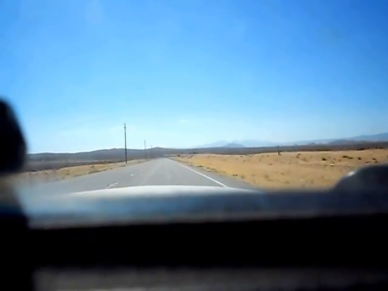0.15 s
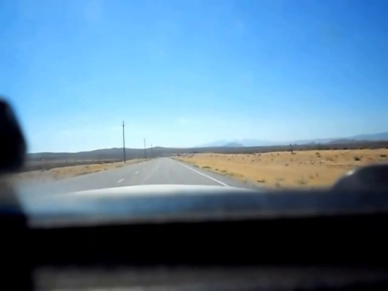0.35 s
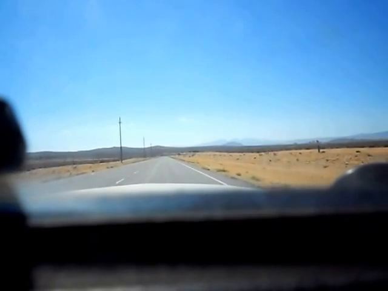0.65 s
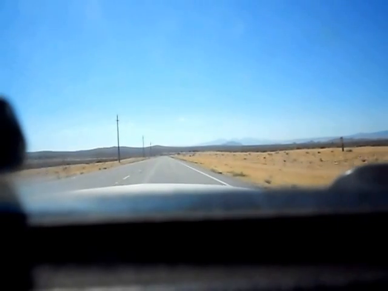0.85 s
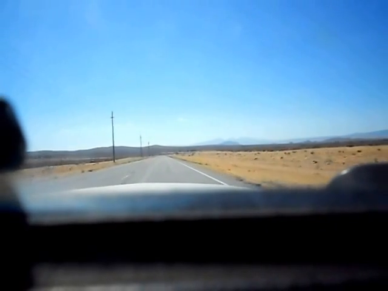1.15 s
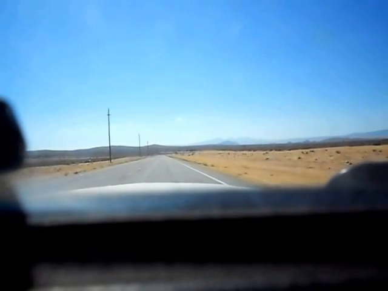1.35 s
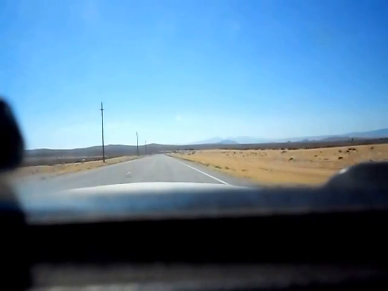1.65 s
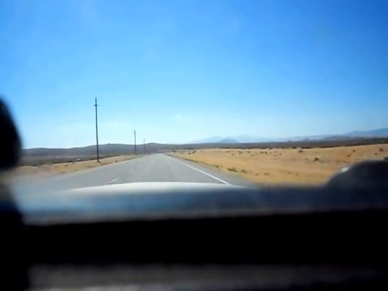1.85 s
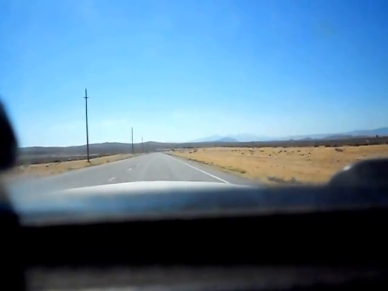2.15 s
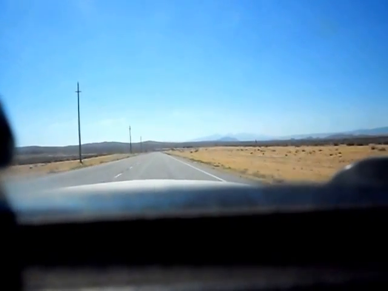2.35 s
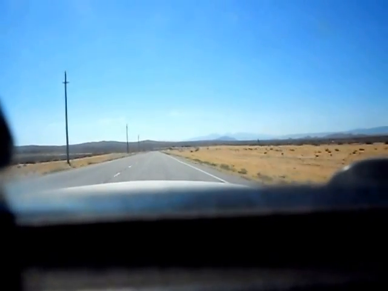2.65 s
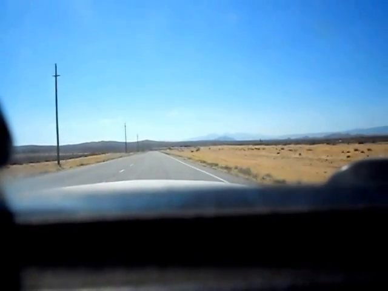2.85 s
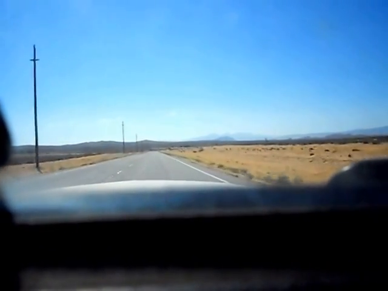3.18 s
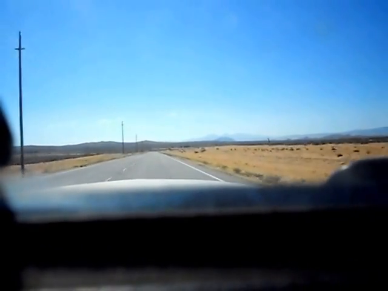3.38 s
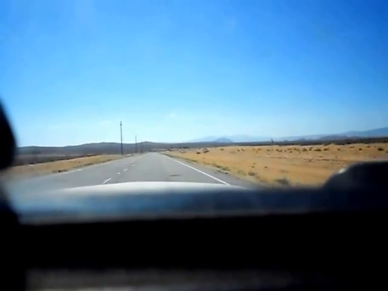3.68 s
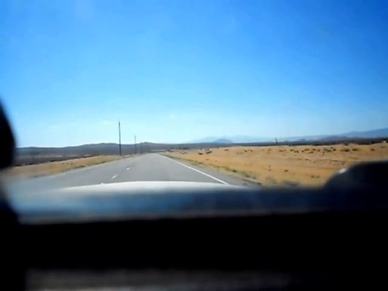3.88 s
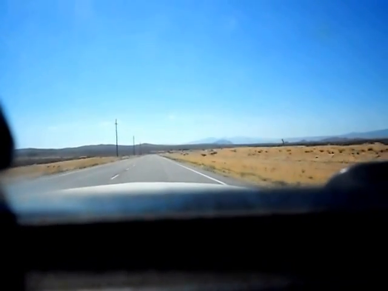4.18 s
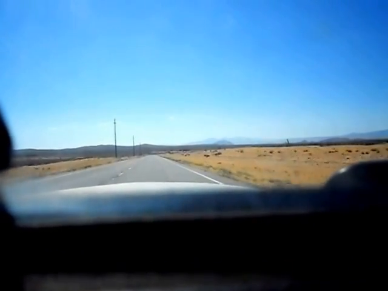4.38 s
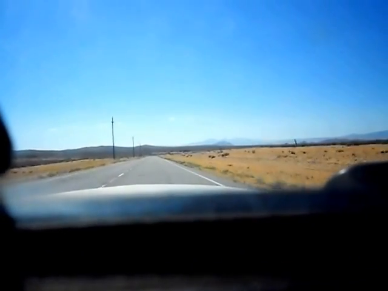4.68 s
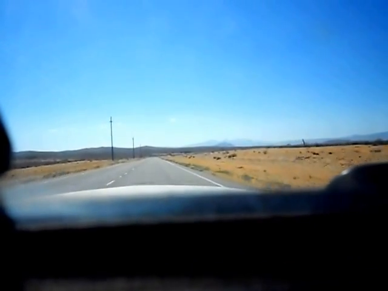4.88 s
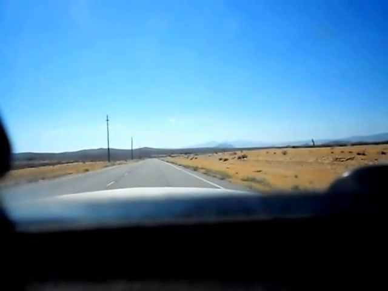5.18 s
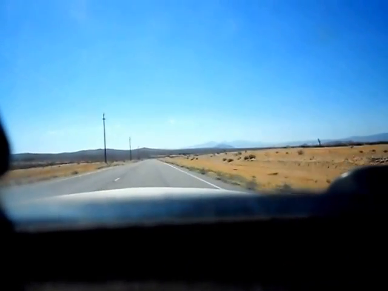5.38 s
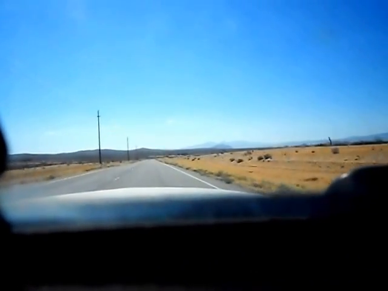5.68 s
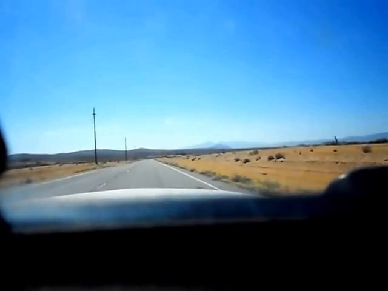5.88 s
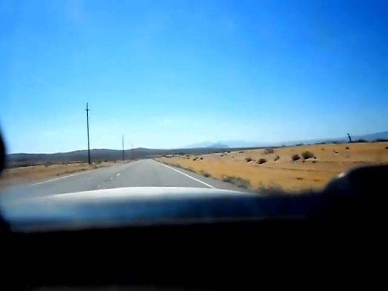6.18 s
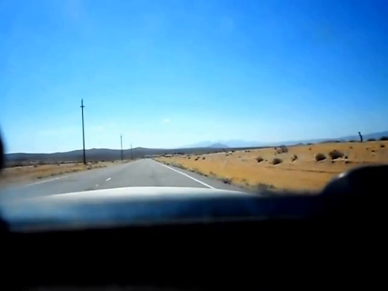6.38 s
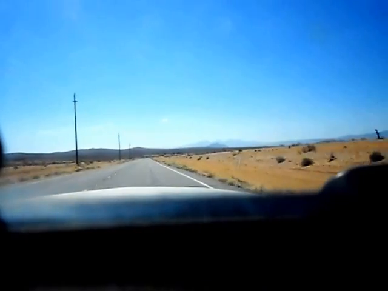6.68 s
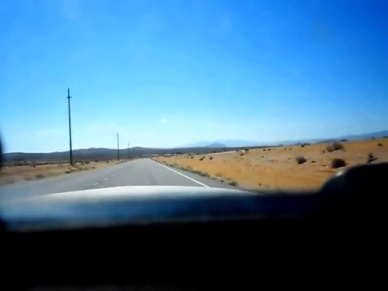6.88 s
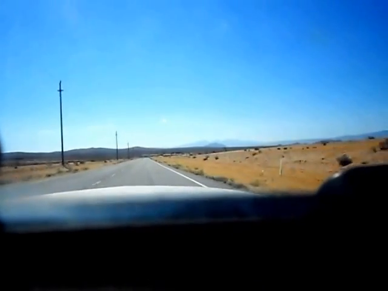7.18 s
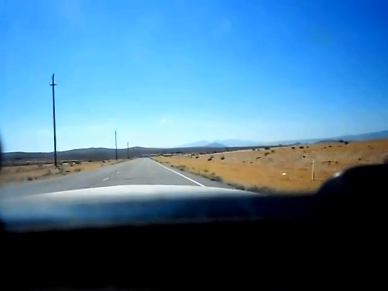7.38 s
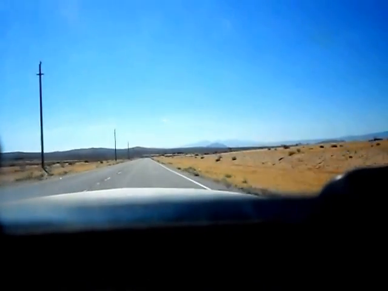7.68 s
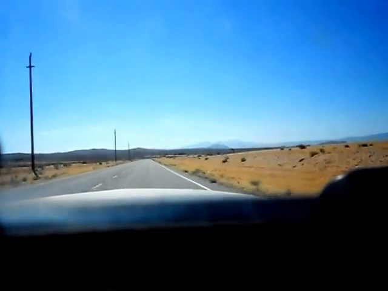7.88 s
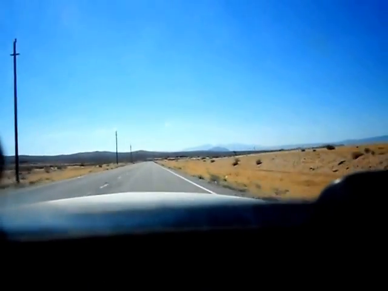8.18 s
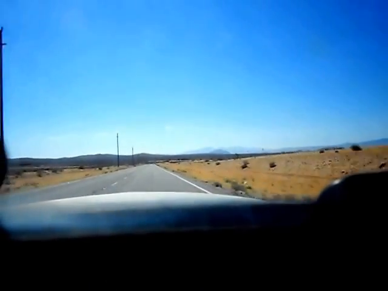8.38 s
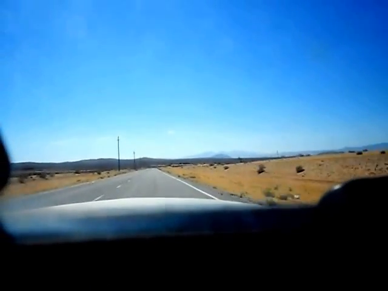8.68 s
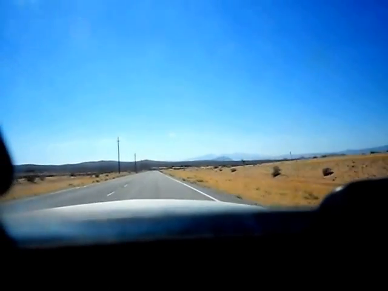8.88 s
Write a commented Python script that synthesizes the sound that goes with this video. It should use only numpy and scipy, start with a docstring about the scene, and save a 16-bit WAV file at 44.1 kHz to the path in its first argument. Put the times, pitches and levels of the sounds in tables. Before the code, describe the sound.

Close inside a car cabin, a muffled six-cylinder engine drones and gradually falls in pitch over tyre roar and deep body rumble. Bumps thud, a panel knocks hollowly, and loose trim ticks and buzzes near the dashboard microphone. After hard jolts around two, four and a half and seven and a half seconds, engine and road suddenly drop quieter, then creep back. The throttle opens at the very end.

```python
"""Inside a car on a desert road, one microphone on the dashboard, about nine seconds.
From the start a six-cylinder engine slows off throttle, a stack of tones sliding through cabin resonances.
Tyres roar and the body booms and rumbles as shaped noise; bumps thud as brief swings, a struck panel rings,
and loose trim buzzes and ticks in noise bursts. Near 2, 4.4 and 7.4 s, after hard bumps, engine and
road noise drop, then creep back. At 8.8 s the throttle opens. The highest peaks are rounded throughout."""
import sys
import numpy as np
from scipy import signal
from scipy.fft import rfft, irfft, next_fast_len
from scipy.io import wavfile
from scipy.ndimage import uniform_filter1d

SR = 44100
rng = np.random.default_rng(int(sys.argv[2]) if len(sys.argv) > 2 else 0)


def int16_out(signal):
    """Quantize to a 16-bit WAV file."""
    q = np.round(np.clip(np.atleast_2d(signal).T, -1, 1) * 32767)
    wavfile.write(sys.argv[1], SR, q.astype(np.int16))


N = 399102

# Level that engine and road noise follow in different shares: time_s, level_db
LEVEL = [(0, -.5), (1.3, 1), (1.92, -2), (1.98, -5.5), (2.5, -5), (3.2, -3.5), (4.37, -2.5), (4.43, -12.5),
         (4.9, -13.5), (5.4, -8.5), (5.95, -10), (7.32, -4.5), (7.4, -18), (8.0, -16), (8.3, -10.5),
         (8.75, -9.5), (9.05, -3.5)]
LEAD = 256  # samples from the start of a tick's buffer to its onset


def engine():
    """Tones on the four-stroke cycle, each swelling as it slides through a cabin resonance."""
    # Engine speed: time_s, cycle_hz
    speed = [(0, 32.49), (0.6, 31.43), (1.2, 30.84), (1.8, 30.24), (3, 29.71), (4.2, 28.46), (5.4, 27.72),
             (6, 27.21), (6.6, 26.68), (7.2, 26.51), (8.4, 25.55), (8.7, 25.52), (8.8, 24.88),
             (8.88, 27.24), (8.92, 26.6), (8.96, 25.24), (9.01, 25.17), (9.05, 26.24)]
    # Tones, 6 = firing, the broken multiple a belt-driven part:
    # multiple_of_cycle, rms_db ahead of the cabin, throttle_db gained besides the overall blip
    orders = [(3, -22, -8), (4, -29, -6), (5, -28, -6), (6, -22.5, 0), (8, -33, -4), (9, -30.5, 0),
              (11, -31.5, 0), (12, -37, 4), (14, -43, 0), (15.65, -38, 0), (18, -43, 7), (24, -47, 2),
              (30, -51, 7), (36, -56, 9), (42, -45, -6), (48, -54, 0)]
    # How the cabin passes engine tones: frequency_hz, gain_db
    cabin = [(70, -6), (82, 0), (95, 0), (105, -1), (127, -3), (138, -7), (155, 0), (167, -1), (180, -8),
             (192, -11), (208, -4), (235, -6), (252, -1), (287, -3), (320, -2), (333, -10), (345, 0),
             (358, -1), (375, -8), (480, -1), (600, -4), (765, 0), (950, -2), (1100, -14), (1220, -13),
             (1285, 0), (1350, -9), (1500, 0)]
    level_share = 0.66
    blip_s, blip_rise_s, blip_db = 8.8, 0.075, 7  # the throttle opens
    uneven_db_per_hz = 1

    (cycle_hz,), (level_db,) = curves(speed), curves(LEVEL)
    throttle = np.clip((np.arange(N) / SR - blip_s) / blip_rise_s, 0, 1)
    # odd tones come from uneven cylinders and fade as the engine slows; the belt tone fades too
    uneven_db = uneven_db_per_hz * (cycle_hz - cycle_hz[0])
    unsteady_hz = cycle_hz * (1 + 0.0006 * wander(6))
    turns = np.cumsum(unsteady_hz) / SR
    out = np.zeros(N)
    for k, db, throttle_db in orders:
        tone_db = db + throttle * throttle_db + read(cabin, k * cycle_hz) + uneven_db * (k % 2)
        # firings vary: the firing tone wavers less than the others
        tone_db = tone_db + (1.0 if k == 6 else 2.8) * wander(5)
        phase = 2 * np.pi * (k * turns + rng.random())
        out += gain_of(tone_db) * np.sqrt(2) * np.sin(phase)
    return gain_of(level_share * level_db + blip_db * throttle) * out


def bumps():
    """The body swings a few cycles on its suspension after each bump, building up over about a cycle."""
    # Bumps: start_s, peak_db, swing_hz, t60_s
    jolts = [(0.075, -15, 34.8, .2), (0.377, -14.5, 94, 0.23), (0.694, -18, 50.6, 0.18),
             (0.828, -16, 26.8, 0.22), (0.856, -13, 85.7, .17), (0.98, -8, 80.5, 0.22),
             (1.08, -15, 95, 0.15), (1.251, -17, 80, 0.13), (1.4, -11, 68.6, 0.2), (1.619, -12, 80.4, .17),
             (1.925, -12, 27, .25), (1.932, -10, 78.6, 0.18), (2.046, -12, 35, 0.14),
             (2.185, -13, 72.9, 0.38), (3.04, -11, 85.3, .17), (3.184, -13.5, 95, .17),
             (3.304, -11, 78.7, .17), (3.572, -8.5, 81.2, 0.22), (3.642, -8.5, 80, 0.23),
             (3.907, -15, 60, .2), (4.22, -10, 92, 0.28), (4.364, -4, 71, 0.22), (5.346, -24, 46, .2),
             (5.419, -11, 86, 0.07), (5.452, -25, 45, 0.22), (5.561, -12, 79, 0.23),
             (5.902, -20, 81.2, 0.25), (6.026, -18.5, 84, 0.22), (6.189, -14, 85.37, 0.55),
             (6.625, -19, 82.7, .17), (6.832, -15, 77.5, 0.15), (7.044, -18, 89, 0.19),
             (7.164, -7, 79.96, 0.083), (7.184, -16, 24.96, 0.38), (7.287, -6, 73.7, 0.19),
             (7.986, -16.5, 63, 0.091), (8.14, -17, 35, 0.18), (8.246, -13.5, 40.8, 0.41),
             (8.262, -14.5, 73, .2), (8.37, -21, 76, 0.12), (8.696, -22, 46, 0.16), (8.844, -19, 38, 0.28)]
    out = np.zeros(N)
    for s, db, hz, t60 in jolts:
        t = np.arange(round(t60 * SR)) / SR
        rise = 1 - np.exp(-t * hz / 0.75)
        swing = gain_of(-60 * t / t60) * rise * np.sin(2 * np.pi * hz * t)
        add(out, s, gain_of(db) * swing / abs(swing).max())
    return out


def knocks():
    """A panel is struck by a blow and a few uneven rebounds, and its modes ring briefly."""
    # Blows: start_s, peak_db, mean_rebound_delay_s
    strikes = [(0.082, -8.5, 0.013), (0.561, -29, 0.0076), (1.082, -4.5, 0.0071), (1.468, -15.5, 0.007),
               (1.605, -10, 0.011), (1.91, -7.5, 0.014), (2.07, -22, 0.007), (2.683, -10, 0.011),
               (3.285, -11.5, 0.0089), (3.575, -9.5, 0.0085), (4.856, -18.5, 0.015), (5.151, -28, 0.012),
               (6.194, -11, 0.013), (6.465, -11, 0.011), (7.301, -8.5, 0.0077), (9, -16, 0.021)]
    # Modes of the panel: frequency_hz, relative_level_db, t60_s
    panel = [(250, -9, .05), (355, -5, .08), (495, 0, .09), (570, -4, .06), (760, -13, .04),
             (1080, -17, .04), (1450, -26, .02)]
    out, t = np.zeros(N), np.arange(SR // 8) / SR
    hz, mode_db, t60 = np.transpose(panel)[:, :, None]
    modes = gain_of(mode_db - 60 * t / t60) * np.sin(2 * np.pi * hz * t)
    soft_onset = 1 - np.exp(-(t / 0.00037) ** 2)
    ring = modes.sum(0) * soft_onset
    for s, db, rebound_s in strikes:
        blows = np.zeros(SR // 16)
        when, size = rng.random((2, 8))
        landing = (when * 2 * rebound_s * SR).astype(int) % len(blows)
        blows[landing] = 0.5 * (2 * size - 1) * np.exp(-1.5 * when)  # later rebounds are weaker
        blows[0] = 1
        knock = signal.fftconvolve(blows, ring)
        add(out, s, gain_of(db) * knock / abs(knock).max())
    return out


def ticks():
    """Loose trim snaps near the microphone: placed ticks, and many faint ones that follow the buzz."""
    # Placed ticks: time_s, peak_db, below_3200_hz_db, above_8800_hz_db
    snaps = [(0.143, -25.5, 3, -39), (0.222, -18, -4.5, -27), (0.269, -33, -5, -26),
             (0.289, -31.5, -7, -25), (0.362, -40, 0, -25), (0.717, -28, -3.5, -30), (0.77, -24.5, -5, -32),
             (0.803, -32, 4, -20), (0.842, -35, -7, -25), (1.026, -26, 2, -35), (1.046, -38, -7, -34),
             (1.17, -32, -2, -29), (1.24, -25, -2, -41), (1.225, -38, -8, -30), (1.32, -24, 4, -34),
             (1.387, -31, -4, -22), (1.42, -33, -12, -15), (1.448, -31, -4, -20), (1.469, -29, -18, -27),
             (1.516, -40, -5, -30), (1.666, -42, -1, -33), (1.697, -39, -4, -34), (1.845, -25, 4, -22),
             (1.908, -24, -3, -28), (1.947, -28.5, -17, -14), (2.104, -34.5, -1, -33),
             (2.142, -33, -3, -27), (2.223, -37, -2, -31), (2.316, -37, -20, -29), (2.383, -39, -14, -24),
             (2.599, -34, -8, -35), (2.699, -29.5, -1, -38), (2.998, -30, 2, -36), (3.085, -35, -7, -32),
             (3.201, -37, -3, -30), (3.379, -40, -5, -29), (3.399, -35, -8, -33), (3.454, -36, -10, -21),
             (3.465, -36, 1, -22), (3.489, -24.5, -4, -29), (3.511, -31, -6, -29), (3.583, -30.5, 5, -35),
             (3.669, -38, -12, -39), (3.779, -40, -15, -35), (4.033, -32, 6, -21), (4.052, -27.5, -10, -37),
             (4.078, -38, 0, -28), (4.11, -28, -3, -35), (4.262, -30, -5, -19), (4.287, -18, -7, -40),
             (4.323, -17, -6, -24), (4.329, -25, -3, -22), (4.367, -33, -20, -15), (4.389, -29, -17, -12),
             (4.401, -39, -8, -22), (4.43, -40, -9, -38), (4.521, -47, -4, -30), (4.768, -44, -6, -24),
             (4.843, -47, -15, -34), (4.896, -43, -6, -33), (5.01, -45, -11, -27), (5.038, -39, -4, -36),
             (5.157, -42, -12, -30), (5.267, -44, -15, -30), (5.426, -44, -10, -19), (5.437, -36, -7, -17),
             (5.465, -19.5, -10.5, -28), (5.471, -28, -5, -31), (5.497, -29, -5, -22),
             (5.504, -28, -8, -24), (5.51, -17.5, -3.5, -23), (5.519, -39, -15, -24),
             (5.562, -44, -16, -12), (5.583, -41, -1, -23), (5.609, -35, -6, -27), (5.769, -37, -5, -30),
             (5.884, -36.5, -9, -27), (6.055, -43, -18, -26), (6.108, -25, -2, -17), (6.19, -37.5, 2, -33),
             (6.261, -41.5, -3, -25), (6.363, -40, -5, -27), (6.374, -36, 0, -29), (6.412, -36, -5, -36),
             (6.441, -42, -3, -33), (6.748, -31, -7, -24), (6.77, -29, -19, -32), (6.796, -40, -6, -34),
             (6.913, -39, -14, -29), (6.943, -39, -5, -30), (6.969, -35.5, -5, -33), (7.172, -29, -3, -26),
             (7.184, -32, -10, -18), (7.199, -27, 0, -25), (7.208, -9, -6, -18.5), (7.217, -32, -4, -20),
             (7.253, -29, -5, -32), (7.304, -37, 0, -20), (7.315, -26, -12, -10), (7.353, -40, -5, -23),
             (7.469, -45.5, -6, -34), (7.491, -51, -13, -32), (7.65, -49, -13, -37), (7.739, -41, -3, -44),
             (8.153, -35, -8, -18), (8.174, -13, -3, -12.5), (8.178, -31, -4, -15), (8.19, -30, -1, -12),
             (8.211, -29, -3, -19), (8.247, -37, -1, -12), (8.257, -18, -2, -15), (8.291, -40, -4, -22),
             (8.325, -32, -3, -24), (8.417, -33, -14, -39), (8.469, -32, 3, -37), (8.647, -39, 1, -41),
             (8.708, -44, -6, -32), (8.759, -38.5, -4, -34), (8.87, -41, -8, -26), (8.899, -34.5, -1, -20),
             (8.91, -29, -2, -17)]
    hard_db, thump_db_per_db = -24.5, 0.5  # ticks harder than this gain body below 1.4 kHz
    out = np.zeros(N)
    for s, db, low_db, top_db in snaps:
        thump_db = thump_db_per_db * max(db - hard_db, 0)
        add(out, s - LEAD / SR, snap(db, low_db, top_db, thump_db))

    buzz_db = buzz_level(0.91)  # faint ticks follow rough road a little less than the buzz does
    for at, size, tone in rng.random((700, 3)):
        faint_db = buzz_db[int(at * N)] + 6.0 - 4.3 * np.log(size + 0.046)
        add(out, at * N / SR, snap(faint_db, -7, -30 + 12 * tone, 0))
    return out


def snap(db, low_db, top_db, thump_db):
    """A noise burst a few ms long in the colour of the trim, peak at db; it starts LEAD samples in."""
    # What a tick rings with: frequency_hz, relative_density_db_per_hz
    trim = [(700, -9.5), (1500, 9.5), (2310, 7.5), (3100, 7.5), (3900, -9.5), (4500, -3.5), (5300, -1.5),
            (6000, -8.5), (6500, -5.5), (7200, -10), (7920, -2.5), (8700, -14.5), (9300, 8.5), (10000, 5.5),
            (11400, 9)]
    t, hz = np.arange(768) / SR, np.fft.rfftfreq(768, 1 / SR)
    u = t / (0.003 / 2.3)  # seconds to units of the burst's fade
    burst = np.roll(rng.standard_normal(768) * u * np.exp(-u ** 1.38), LEAD)
    colour_db = read(trim, hz) + low_db * (hz < 3200) + top_db * (hz > 8800)
    colour_db = colour_db + thump_db * (hz < 1400) - 40 * (hz < 600)
    z = rfft(burst)
    z = z / np.sqrt(uniform_filter1d(abs(z) ** 2, size=9))  # a full snap, without broad gaps
    out = irfft(z * gain_of(colour_db)) * np.hanning(768) ** 0.5
    return gain_of(db) * out / abs(out).max()


def tyre_roar():
    """Tyre noise through the floor: broadband noise that swells on rough road and flutters slightly."""
    # Colour of the roar: frequency_hz, relative_density_db_per_hz
    roar_colour = [(100, -32.5), (135, 2), (165, -4), (200, -8), (260, -6), (350, -6.5), (420, -10.5),
                   (490, -8), (620, -14), (760, -14), (850, -18), (925, -14.5), (1370, -23.5), (2000, -38),
                   (2950, -43), (6100, -60), (8000, -62), (11400, -75.5)]
    base_db = -30.5  # rms of the 700-1700 Hz band before level and road move it
    low_hz, low_db, low_share = 423, -1.5, 0.76  # the low end follows the level less

    (level_db,), (_, rough_db, _) = curves(LEVEL), shaking()
    roar = noise(roar_colour, size=1024, patchy_db=0.7)
    middle = signal.sosfilt(signal.butter(4, [700, 1700], "band", fs=SR, output="sos"), roar)
    low = signal.sosfiltfilt(signal.butter(2, low_hz, fs=SR, output="sos"), roar)
    roar = roar + low * (gain_of(low_db + (low_share - 1) * level_db) - 1)
    roar_db = base_db + level_db + rough_db + 1.2 * wander(25)
    return gain_of(roar_db) * roar / middle.std()


def body_boom():
    """The car body booms: low noise that swings in uneven lumps and heaves on rough road."""
    # Colour of the boom: frequency_hz, relative_density_db_per_hz
    boom_colour = [(45, -25.5), (58, 0.5), (68, 4), (81, 3), (98, 3), (110, -6.5), (124, -14.5),
                   (140, -17.5)]
    base_db, level_share = -23.5, 0.43
    (level_db,), (_, _, heave_db) = curves(LEVEL), shaking()
    boom_db = base_db + level_share * level_db + heave_db + 2.87 * wander(11.3)
    boom = noise(boom_colour, size=4096, patchy_db=0.2)
    return gain_of(boom_db) * steadied(boom, size=1300, share=0.95)


def deep_rumble():
    """The floor rumbles beneath the boom: deeper noise that swings in slower lumps."""
    # Colour of the rumble: frequency_hz, relative_density_db_per_hz
    rumble_colour = [(10, -31), (16, -3.5), (25, -4.5), (35, -1.5), (46, 4.5), (56, -13), (70, -29.5)]
    base_db, level_share = -25.5, 0.35
    (level_db,), (_, _, heave_db) = curves(LEVEL), shaking()
    rumble_db = base_db + level_share * level_db + heave_db + 2.8 * wander(5.9)
    rumble = noise(rumble_colour, size=8192, patchy_db=1.0)
    return gain_of(rumble_db) * steadied(rumble, size=2600, share=1.0)


def trim_buzz():
    """Loose trim buzzes in short uneven bursts: patchy treble noise under a fast random level."""
    # Colour of the buzz: frequency_hz, relative_density_db_per_hz
    buzz_colour = [(1300, -31.5), (2300, 7), (3200, -4), (3900, -3.5), (4600, -5), (6500, -14.5),
                   (7200, -36.5), (8000, -18), (10000, -17), (11400, -39)]
    bursts = gain_of(4.3 * wander(140))
    return gain_of(buzz_level()) * evened(bursts * noise(buzz_colour, size=256, patchy_db=2.5))


def buzz_level(share=1):
    """How loud the trim buzzes, in dB, with a share of what rough road adds."""
    base_db, level_share = -60, 0.8
    return base_db + level_share * curves(LEVEL)[0] + share * shaking()[0]


def shaking():
    """Buzz, roar and boom-with-rumble gained on rough stretches, in dB: each rises, holds and falls."""
    # Rough stretches of road: start_s, length_s, buzz_gain_db, roar_gain_db, boom_and_rumble_gain_db
    rough = [(0, 0.092, 4.5, 0, 3.5), (0.343, 0.04, 6, 1.5, 0), (0.76, 0.12, 7.5, 1, -4),
             (0.965, 0.16, 4.5, 1, 1.5), (1.196, .3, 6.5, 0, -1.5), (1.605, .05, 4, 0, 1.5),
             (1.781, 0.18, 7, 2, 1.5), (2.42, 0.1, 1, 0, -3), (2.557, 0.28, 5.5, -1, 5),
             (3.147, 0.083, 2, 1.5, -0.5), (3.443, .16, 11, 2, 3), (4.02, 0.18, 8, 2, 2.5),
             (4.248, .13, 14.5, 4, 2.5), (4.405, 0.054, 7, 0, 1), (4.75, 0.043, 9, 1, 3.5),
             (4.98, 0.064, 4, 1, 0), (5.427, 0.17, 16, 3.5, 7.5), (5.622, .05, 6.5, -0.5, 2),
             (6.08, 0.085, 8.5, 0.5, 1), (6.212, 0.35, 1.5, 0, 5), (6.363, 0.066, 6, 0, -1),
             (6.734, 0.059, 8, 0, 3.5), (7.169, 0.12, 10.5, 2, 3), (7.33, 0.036, 6, -0.5, -0.5),
             (8.14, .2, 16, 6.5, 6), (8.377, 0.062, 9, 0, 3.5), (8.875, 0.12, 7, 0.5, -2)]
    rise_s, fall_s = 0.015, 0.04
    t, out = np.arange(0, N, 64) / SR, 0  # every 64th sample is enough
    for s, length, *gained_db in rough:
        rise = 1 + (t - s) / rise_s
        fall = 1 - (t - s - length) / fall_s
        out = out + np.outer(gained_db, np.clip(np.minimum(rise, fall), 0, 1))
    return [np.interp(np.arange(N) / SR, t, row) for row in out]


def noise(spectrum, size, patchy_db):
    """Noise from random short-time spectra with patches drifting over time and pitch, rms 1."""
    frames, hz = 4 * N // size + 5, np.fft.rfftfreq(size, 1 / SR)
    a, b, patches = rng.standard_normal((frames, len(hz), 3)).T
    patches = uniform_filter1d(patches, size=10, axis=0)  # across frequency
    patches = evened(uniform_filter1d(patches, size=6, axis=1))  # across time
    inside = (hz >= spectrum[0][0]) & (hz <= spectrum[-1][0])
    colour_db = read(spectrum, hz)[:, None] + patchy_db * patches
    z = (a + 1j * b) * gain_of(colour_db) * inside[:, None]
    return evened(signal.istft(z, nperseg=size, noverlap=3 * size // 4)[1][:N])


def steadied(x, size, share):
    """Divides out a share of the sound's own swelling, rms 1."""
    power = uniform_filter1d(uniform_filter1d(x ** 2, size=size), size=size)
    swing = np.sqrt(abs(power) + 0.02)
    return evened(x / swing ** share)


def wander(hz):
    """Slow random drift of rms 1 up to about hz."""
    lowpass = signal.butter(2, hz, fs=SR, output="sos")
    drift = signal.sosfilt(lowpass, rng.standard_normal(N + SR))
    return evened(drift[SR:])  # past the filter's start


def gain_of(db):
    """Decibels to an amplitude factor."""
    return 10 ** (np.asarray(db) / 20)


def evened(x):
    """Scales to rms 1."""
    return x / np.sqrt(np.mean(x ** 2) + 1e-20)


def read(points, hz):
    """A spectrum table at the given frequencies, interpolated on a log frequency scale."""
    f, value = np.transpose(points)
    return np.interp(np.log(hz + 1), np.log(f + 1), value)


def curves(rows):
    """The columns of a time table, sample by sample."""
    s, *columns = np.transpose(rows)
    return [np.interp(np.arange(N) / SR, s, c) for c in columns]


def add(mix, s, sound):
    """Mixes a sound in at time s."""
    part = mix[round(s * SR):][:len(sound)]
    part += sound[:len(part)]


def scene():
    """Everything reaches one microphone on the dashboard."""
    road = tyre_roar() + body_boom() + deep_rumble() + trim_buzz()
    return (engine() + bumps() + knocks() + ticks() + road)[None]


def record(dry):
    """The microphone dulls the top, the input rounds off the highest peaks; then the band limit."""
    # Response of the microphone: frequency_hz, gain_db
    microphone = [(20, 1), (10200, -1.5), (10700, -6.5), (11100, -25.5), (11500, -38.5)]
    ceiling, edge_hz = 0.56, 11500  # ceiling in full-scale amplitude
    size = next_fast_len(N + 4096)
    response = gain_of(read(microphone, np.fft.rfftfreq(size, 1 / SR)))
    heard = irfft(rfft(dry, size) * response, size)[:, :N]
    rounded = heard / (1 + abs(heard / ceiling) ** 4) ** (1 / 4)
    band_limit = signal.firwin(511, edge_hz, window=("kaiser", 9), fs=SR)
    return signal.oaconvolve(rounded, band_limit[None], "same")


dry = scene()
out = record(dry)
int16_out(out)
```